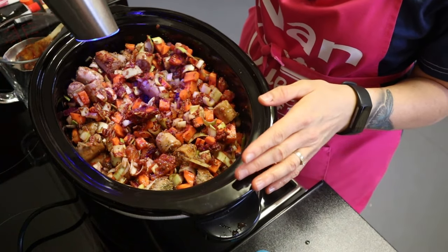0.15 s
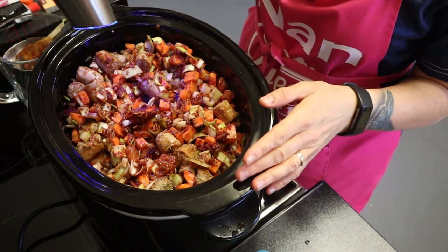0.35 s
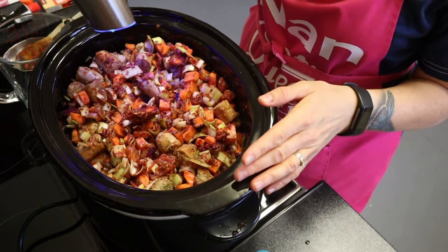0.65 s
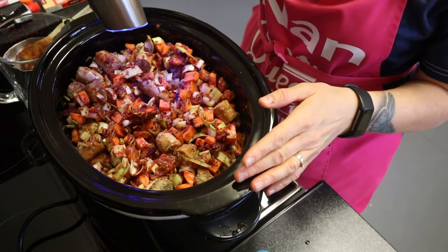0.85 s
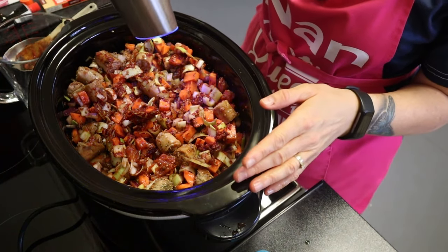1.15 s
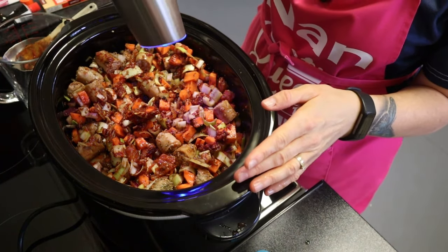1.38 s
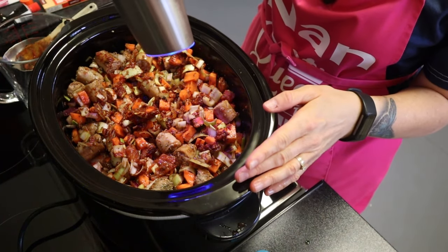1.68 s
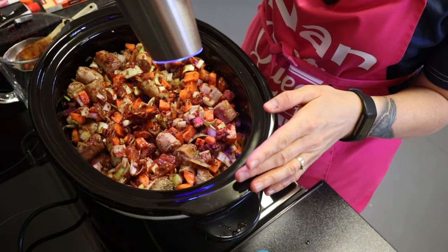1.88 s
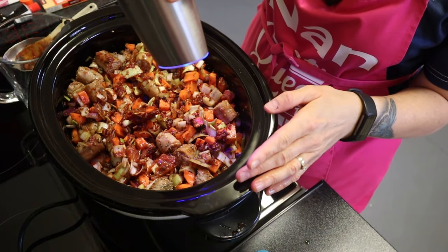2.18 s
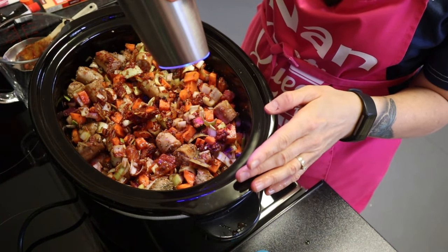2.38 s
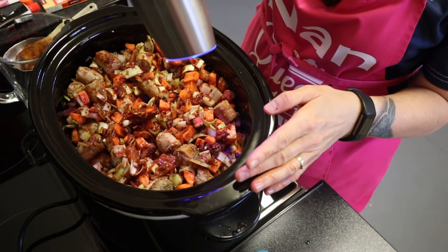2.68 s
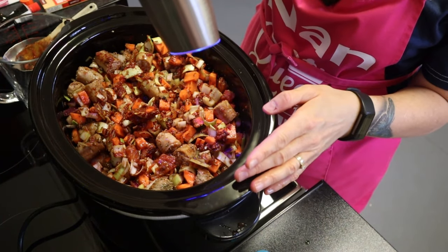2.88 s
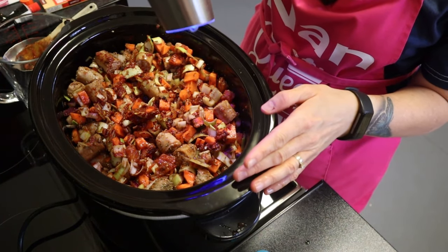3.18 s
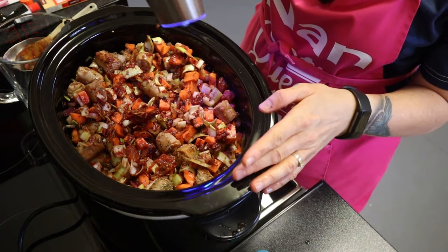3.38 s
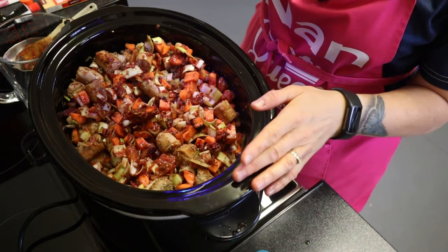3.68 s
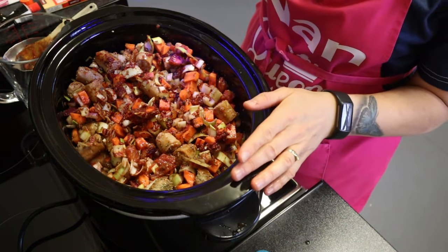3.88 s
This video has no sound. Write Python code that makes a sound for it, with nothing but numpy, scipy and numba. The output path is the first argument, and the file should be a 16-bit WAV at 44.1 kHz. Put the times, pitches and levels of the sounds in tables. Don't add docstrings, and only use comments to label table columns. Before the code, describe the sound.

A handheld electric pepper mill is already running over a full pot in a small kitchen, heard in mono from about an arm's length. A wavering motor and gear whine mixes with tinny tube rattle and dense, crisp crushing hiss. Single corns snap; after about a second the motor bogs down and squeals, recovers, then labours unevenly to the end.

```python
import sys
import numpy as np
from scipy import signal
from scipy.fft import rfft, irfft
from scipy.io import wavfile
from scipy.ndimage import uniform_filter1d
from numba import njit

SR = 44100
rng = np.random.default_rng(int(sys.argv[2]) if len(sys.argv) > 2 else 0)


def transcribe(signal):
    frames = np.atleast_2d(signal).T
    limited = np.clip(frames, -1, 1)
    pcm = np.round(limited * 32767).astype(np.int16)
    wavfile.write(sys.argv[1], SR, pcm)


def makeup_ratio(level_db):
    decades = np.asarray(level_db, float) / 20
    return 10 ** decades


N = 178153
TIME = np.arange(N) / SR
PLANET, CARRIER = 4 / 9, 1 / 3


def unit(x):
    return x / np.sqrt(np.mean(x ** 2))


def colour(x, spectrum):
    hz, db = np.transpose(spectrum)
    size = 4096
    grid = np.log(np.arange(size // 2 + 1) * SR / size + 1)
    log_gain = np.interp(grid, np.log(hz), db) * np.log(10) / 20
    cepstrum = irfft(log_gain)
    cepstrum[1:size // 2] *= 2
    cepstrum[size // 2 + 1:] = 0
    response = irfft(np.exp(rfft(cepstrum)))
    return signal.fftconvolve(x, response)[:N]


@njit
def ring(x, hz, width):
    y, band, low = np.empty(len(x)), 0., 0.
    for i in range(len(x)):
        g, k = np.tan(np.pi * hz[i] / SR), width / hz[i]
        v = (band + g * (x[i] - low)) / (1 + g * (g + k))
        band, low, y[i] = 2 * v - band, low + 2 * g * v, k * v
    return y


def walk(rate):
    hold = int(SR / rate)
    steps = np.repeat(rng.standard_normal(N // hold + 1), hold)
    return unit(uniform_filter1d(uniform_filter1d(steps, hold), hold)[:N])


def tone(turns, multiple, flutter_db, slip, rate=40):
    level = np.sqrt(2) * makeup_ratio(flutter_db * walk(rate))
    phase = 2 * np.pi * multiple * turns + slip * walk(rate) + 7 * rng.random()
    return level * np.sin(phase)


def knocks(turns, multiple, depth_db):
    return makeup_ratio(-depth_db * (multiple * turns % 1))


def grains(scatter_db):
    size_db = scatter_db * np.minimum(rng.exponential(size=N), 5.)
    return unit(rng.standard_normal(N) * makeup_ratio(size_db))


def curves(table):
    s, *columns = np.transpose(table)
    return [np.interp(TIME, s, c) for c in columns]


def bumps(table):
    s, half, *heights = np.transpose(table)
    coarse = TIME[::64]
    bell = np.exp(-.5 * ((coarse[:, None] - s) / half) ** 2)
    return [np.interp(TIME, coarse, bell @ h) for h in heights]


def spells(table, quiet_db):
    held = []
    for start, end, db in table:
        away = np.maximum(np.maximum(start - TIME, TIME - end), 0)
        held.append(db - 200 * away)
    return np.maximum(np.max(held, axis=0), quiet_db)


def gate(start, end):
    return np.clip(np.minimum(TIME - start, end - TIME) / .02, 0, 1)


# (frequency [Hz], level [dB per Hz])
AIR_SHAPE = [(20, -44), (35, -19), (60, -17), (100, -5.5), (170, -5.5), (300, -1), (450, 0.5), (700, -7),
             (1200, -53)]
# (frequency [Hz], level [dB rms])
MAINS_HUM = [(49.8, -78), (298, -74)]


def background():
    hum = sum(np.sqrt(2) * makeup_ratio(db) * np.sin(2 * np.pi * hz * TIME) for hz, db in MAINS_HUM)
    air_db = -64.5 + 1.3 * (TIME - 2)
    return hum + makeup_ratio(air_db) * unit(colour(rng.standard_normal(N), AIR_SHAPE))


# (time [s], shaft speed [Hz])
SHAFT_SPEED = [(0.0, 219.3), (0.13, 226.3), (0.42, 231.8), (0.67, 226.2), (0.91, 237.6), (1.15, 226.5),
               (1.29, 185.2), (1.44, 198.0), (1.69, 201.6), (1.92, 226.8), (2.07, 238.7), (2.28, 225.1),
               (2.5, 218.7), (2.82, 209.9), (3.05, 190.8), (3.3, 209.6), (3.74, 233.7), (4.04, 234.1)]
# (time [s], half width [s], drag [Hz])
BRAKING_CORNS = [(0.063, 0.025, 4.7), (0.312, 0.061, 6.0), (0.496, 0.047, 12.2), (0.738, 0.039, 10.9),
                 (0.962, 0.023, 2.3), (1.17, 0.022, 9.3), (1.382, 0.03, 16.7), (1.524, 0.06, 7.3),
                 (1.736, 0.052, 27.0), (2.185, 0.058, 17.0), (2.377, 0.015, 1.4), (2.648, 0.065, 12.7),
                 (2.927, 0.049, 8.1), (3.104, 0.045, 3.9), (3.415, 0.058, 0.9)]


def shaft():
    drag = bumps(BRAKING_CORNS)[0]
    return uniform_filter1d(curves(SHAFT_SPEED)[0], 900) - drag, drag


# (time [s], commutator level [dB], rotor imbalance level [dB])
MOTOR_WHINE = [(0.0, -38.5, -62), (0.18, -42.5, -56.0), (0.39, -40.5, -55), (0.53, -44, -57),
               (0.81, -44, -57), (1.04, -43.5, -55.5), (1.22, -40.5, -58), (1.27, -52, -64.5),
               (1.64, -49, -61), (1.94, -43.5, -57), (2.32, -37.5, -57), (2.59, -39.5, -60),
               (2.69, -44.0, -59), (2.78, -39.5, -60.5), (3.07, -51.5, -61), (3.29, -42.0, -60.5),
               (3.68, -43, -55.5), (4.04, -44.5, -56)]
# (start [s], end [s], level [dB])
COMMUTATOR_SPELLS = [
    (.8, .84, -38.5),
    (1.35, 1.39, -45.5),
    (1.52, 1.58, -46),
    (1.75, 1.8, -46),
]
ROTOR_MULTIPLES = 1, 4, 5, 6
# (start [s], end [s], level [dB])
OVERTONE_SPELLS = [
    [(0, .05, -52), (2.2, 2.45, -49.5), (2.55, 2.9, -56)],
    [(.2, .52, -47.5), (.62, .86, -44.5), (1.85, 1.94, -43.5), (2.2, 2.45, -47), (3.35, 3.62, -48.5)],
    [(.3, .36, -48), (.58, .7, -44), (1.9, 1.96, -74), (3.45, 3.62, -45)],
]


def motor(turns, drag):
    pole_db, imbalance_db = curves(MOTOR_WHINE)
    rotor_db = [imbalance_db + 1 - 0.28 * drag]
    rotor_db += [spells(overtone, -59.5) for overtone in OVERTONE_SPELLS]
    rotor = 0
    for k, db in zip(ROTOR_MULTIPLES, rotor_db):
        rotor = rotor + makeup_ratio(db) * tone(turns, k, flutter_db=.4 * k, slip=.06 * k, rate=30)
    commutator = tone(turns, 3., flutter_db=1.1, slip=.2, rate=50)
    return rotor + makeup_ratio(spells(COMMUTATOR_SPELLS, pole_db)) * commutator


TOOTH_MULTIPLES = 20 / 3, 7, 8, 9
# (start [s], end [s], level [dB])
GEAR_SPELLS = [
    [(0, .08, -38.5), (.66, .74, -40.5), (.88, 1.1, -39.5), (1.12, 1.21, -34), (2.09, 2.19, -35),
     (2.22, 2.55, -36), (2.68, 2.9, -47), (2.92, 3.2, -43.5)],
    [(.08, .42, -41.5), (.47, .64, -36.5), (.68, .92, -41), (1.13, 1.24, -40.5), (1.47, 1.62, -41.5),
     (1.82, 1.92, -39.5), (2.18, 2.33, -45), (2.5, 2.6, -43.5), (2.77, 2.9, -43), (3.08, 3.42, -48),
     (3.72, 4.04, -45)],
    [(1.47, 1.53, -43), (1.66, 1.76, -39.5), (2.64, 2.73, -43), (2.97, 3.1, -45)],
    [(.3, .7, -50.5), (.86, .98, -49), (1.2, 1.33, -41.5), (1.42, 1.7, -41.5), (2.45, 2.55, -46),
     (3.05, 3.13, -47), (3.5, 4.04, -49)],
]


def gears(turns):
    throb = unit(knocks(turns, PLANET, depth_db=5.))
    out = 0
    for k, spell in zip(TOOTH_MULTIPLES, GEAR_SPELLS):
        level = makeup_ratio(spells(spell, -55) + 2.5)
        out = out + level * throb * tone(turns, k, flutter_db=1.7, slip=.3, rate=90)
    return out


# (time [s], half width [s], extra crushing [dB], extra gear strain [dB])
MOUTHFULS = [(0.08, 0.064, 0.5, 1.7), (0.276, 0.078, 2.5, -0.2), (0.441, 0.049, 3.5, 2.5),
             (0.625, 0.032, 1.8, 1.6), (0.707, 0.026, 4.5, 3.5), (0.805, 0.028, -0.5, -1),
             (0.95, 0.06, 3.2, 0), (1.01, 0.015, -0.5, -2.3), (1.159, 0.02, 2.5, 4), (1.271, 0.09, 4, 9),
             (1.369, 0.019, 1.5, 2.4), (1.472, 0.033, 5.5, 7.4), (1.551, 0.023, 0.7, 2),
             (1.7, 0.063, 5, 10.4), (1.807, 0.078, -2, -2.5), (1.931, 0.047, 5, 3), (2.152, 0.045, 4.5, 6),
             (2.255, 0.014, 2.5, -3), (2.384, 0.054, 4.5, 4), (2.497, 0.022, 3, 4.5),
             (2.645, 0.093, 4.5, 4.5), (2.885, 0.06, 4, 5), (3.063, 0.06, 2.5, 4), (3.267, 0.07, 2, 3),
             (3.444, 0.074, 2.5, 4), (3.532, 0.023, -0.5, -1), (3.66, 0.053, 3.5, 3.5),
             (3.882, 0.07, 4, 1.5), (4.013, 0.018, 3, 5.5)]


def mouthfuls():
    return bumps(MOUTHFULS)


# (multiple of shaft speed, level before the tube colours it [dB])
RATTLE_TONES = [(2, -24), (3.55, -31.5), (6.222, -45), (7.11, -30), (9.667, -26), (10.22, -28)]
# (frequency [Hz], level [dB per Hz])
TUBE_SHAPE = [(120, -61), (250, -53), (400, -44), (520, -16.5), (640, -13), (800, -20), (1050, -9),
              (1300, -8.5), (1520, -4), (1750, -7.5), (2000, -20.5), (2600, -36.5), (4000, -75.5)]
# (frequency [Hz], level [dB per Hz])
CAP_SHAPE = [(700, -75.5), (1400, -22), (1850, -3), (2200, 2.5), (2500, -0.5), (2900, -4), (3600, -7.5),
             (4200, -5), (6000, -60)]
# (time [s], level [dB])
HAND_GRIP = [(0, 1.5), (.25, .5), (.5, -2), (.68, -0.5), (.82, -1), (.95, 3), (1.05, -1), (1.2, 1),
             (1.7, 0), (2.0, -1), (2.15, 1.5), (2.5, 0.5), (2.75, -1), (3.0, 1), (3.25, -2), (3.6, 0),
             (3.85, 1.5), (4.04, -3)]


def tube(hz, turns, strain):
    beat = knocks(turns, PLANET, depth_db=5.) * knocks(turns, CARRIER, depth_db=2.5) * makeup_ratio(1.1 * walk(60))
    rattle = unit(beat * grains(scatter_db=3.0))
    sides = sum(makeup_ratio(db) * tone(turns, k, flutter_db=2.5, slip=0.27, rate=17) for k, db in RATTLE_TONES)
    bunched = ring(rattle, 6.85 * hz, 220.)
    body_db = -32.5 + 0.36 * strain + curves(HAND_GRIP)[0] - 3.5
    cap_db = -41.5 + strain - 2.5
    body = makeup_ratio(body_db) * unit(colour(rattle + bunched + sides, TUBE_SHAPE))
    return body + makeup_ratio(cap_db) * unit(colour(rattle + sides, CAP_SHAPE))


# (frequency [Hz], level [dB per Hz])
SHEAR_SHAPE = [(1500, -104), (3600, -39), (5000, -8.5), (5700, -2.5), (6600, -1), (8000, -6.5), (9400, -20),
               (12000, -35), (16000, -69)]
# (frequency [Hz], level [dB per Hz])
CONE_SHAPE = [(800, -103), (2600, -6.5), (3600, -8), (4000, -1), (4450, -0.5), (4750, -5.5), (5150, -0.5),
              (5700, 0), (7000, -35), (12000, -89)]
# (frequency [Hz], level [dB per Hz])
GRIT_SHAPE = [(3000, -75), (7000, -10), (9000, 1), (11000, -4.5), (13300, -10.5), (15600, -23),
              (17000, -35)]
# (time [s], mouth pitch [Hz], mouth strength [dB], cone level above crushing [dB])
TUBE_AIM = [(0, 6600, 2, 0), (.4, 6550, -3, -7.5), (.72, 5900, -2, -5), (1.0, 6400, 0, -5.5),
            (1.3, 6600, 1.5, -3.5), (1.7, 6600, -2, -3), (1.95, 6530, 2, -3.5), (2.25, 7000, 0, -1.5),
            (2.4, 6600, -1, -2), (2.7, 6700, -4, -2.5), (3.35, 5950, 1, -3), (3.6, 7100, -1, -2),
            (3.78, 6550, -14, -7), (4.04, 6300, -8, -6)]


def burr(turns, crush):
    mouth_hz, mouth_db, cone_db = curves(TUBE_AIM)
    beat = knocks(turns, PLANET, depth_db=3.5)
    fractures = [beat * makeup_ratio(1.17 * walk(120)) * grains(scatter_db=2.0) for part in range(3)]
    hiss = unit(colour(fractures[0], SHEAR_SHAPE))
    shear = unit(hiss + makeup_ratio(mouth_db) * ring(hiss, mouth_hz, 820.0))
    cone = unit(colour(fractures[1], CONE_SHAPE))
    corn_hz = 4730 + 110 * walk(6.54)
    cone = unit(cone + makeup_ratio(3.0 + 1.0 * walk(5.4)) * ring(cone, corn_hz, 330.0))
    grit = unit(colour(fractures[2] + 0.35 * fractures[0], GRIT_SHAPE))
    grit_db = -13 - 0.13 * crush + 0.1
    return makeup_ratio(-38.5 + crush) * (shear + makeup_ratio(cone_db) * cone + makeup_ratio(grit_db) * grit)


def kitchen(x, t60_s=0.25, wet_db=-12):
    t = TIME[:SR // 3]
    tail = rng.standard_normal(len(t)) * makeup_ratio(-60 * t / t60_s) * (t > .003)
    tail = tail / np.sqrt(np.sum(tail ** 2))
    return x + makeup_ratio(wet_db) * signal.fftconvolve(x, tail)[:N]


# (time [s], snap level [dB], thump level [dB], treble level [dB])
BURSTING_CORNS = [(.445, -34, -22, -50), (.68, -34, -44, -34), (.908, -32, -44, -42),
                  (1.168, -30, -20, -46), (1.3632, -17, -20, -25), (1.655, -28, -32, -46),
                  (1.6795, -25, -30, -37), (1.690, -25, -32, -40), (2.008, -32, -44, -39),
                  (2.105, -24, -40, -38), (2.4972, -19, -25, -22), (2.70, -32, -44, -40),
                  (3.932, -32, -44, -42)]


def cracks():
    t = TIME[:SR // 20]
    out = np.zeros(N + len(t))

    def band(x, low_hz, high_hz):
        return unit(signal.sosfilt(signal.butter(3, [low_hz, high_hz], "band", fs=SR, output="sos"), x))

    for s, snap_db, thump_db, treble_db in BURSTING_CORNS:
        splinters = rng.standard_normal(len(t)) * np.exp(-t / .0009)
        thump = rng.standard_normal(len(t)) * np.exp(-t / .004)
        burst = makeup_ratio(snap_db - 21) * band(splinters, 5000, 8000)
        burst += makeup_ratio(treble_db - 24) * band(splinters, 8500, 13000)
        burst += makeup_ratio(thump_db - 24.5) * band(thump, 600, 1100)
        first = int(s * SR)
        out[first:first + len(t)] += burst
    return out[:N]


# (start [s], end [s], multiple of shaft speed, level [dB])
GEAR_SQUEALS = [
    (1.22, 1.39, 13.8, -41),
    (1.42, 1.7, 13.8, -42.5),
    (3.78, 4.04, 12, -55),
]


def squeals(turns):
    out = 0
    for start, end, k, db in GEAR_SQUEALS:
        out = out + makeup_ratio(db) * gate(start, end) * tone(turns, k, flutter_db=2., slip=.5, rate=120)
    return out


# (start [s], end [s], pitch [Hz], level [dB])
WEDGED_RINGS = [
    (1.24, 1.33, 2200, -39),
    (1.43, 1.48, 2180, -44),
    (1.65, 1.74, 2180, -42),
    (1.64, 1.78, 2490, -41.5),
    (1.42, 1.76, 5100, -47.5),
    (2.11, 2.2, 4900, -40),
    (2.47, 2.53, 3000, -48),
    (2.6, 2.94, 4500, -46),
    (3.38, 3.48, 4000, -48),
]


def rings():
    out = 0
    for start, end, hz, db in WEDGED_RINGS:
        rough = tone(TIME, hz, flutter_db=3., slip=hz / 3500, rate=hz / 20)
        out = out + makeup_ratio(db) * gate(start, end) * rough
    return out


def scene():
    hz, drag = shaft()
    turns = np.cumsum(hz) / SR
    crush, strain = mouthfuls()
    mill = gears(turns) + tube(hz, turns, strain) + burr(turns, crush)
    mill = mill + cracks() + squeals(turns) + rings()
    mill = signal.sosfilt(signal.butter(4, 200, "high", fs=SR, output="sos"), mill)
    mono = background() + motor(turns, drag) + kitchen(mill)
    return np.array([mono, mono])


def band_limit(x):
    return signal.sosfilt(signal.butter(12, 15790, fs=SR, output="sos"), x)


def record(dry):
    return band_limit(dry)


dry = scene()
out = record(dry)
transcribe(out)
```